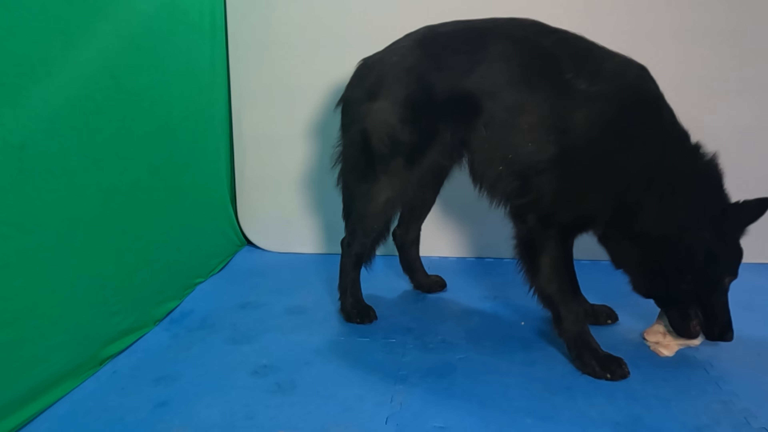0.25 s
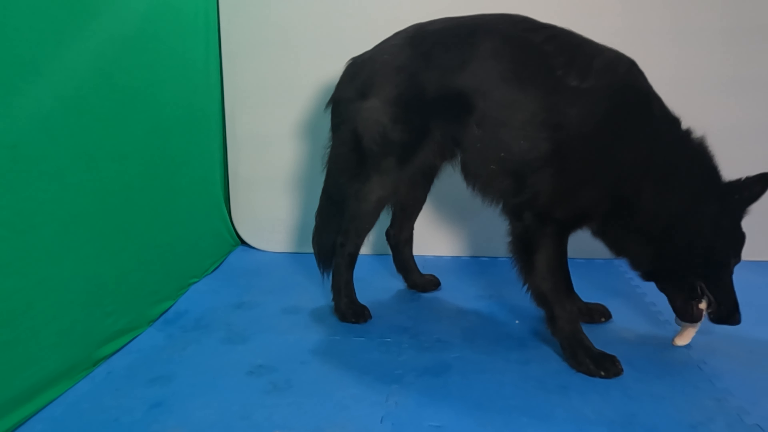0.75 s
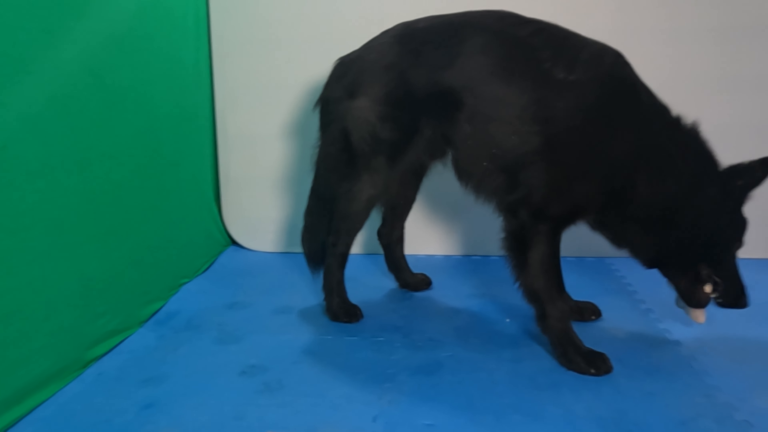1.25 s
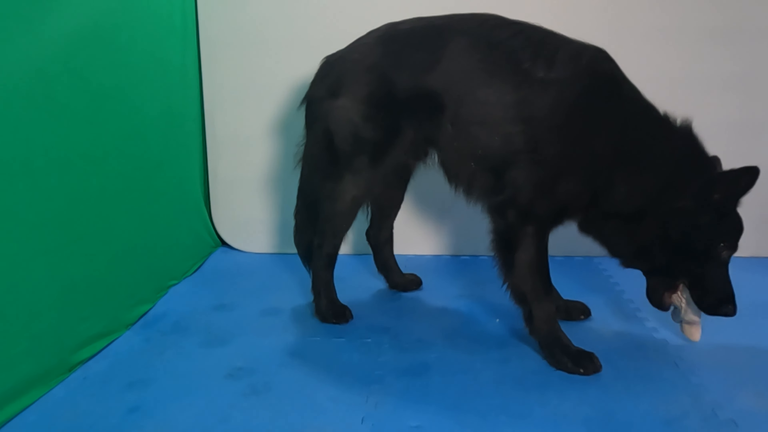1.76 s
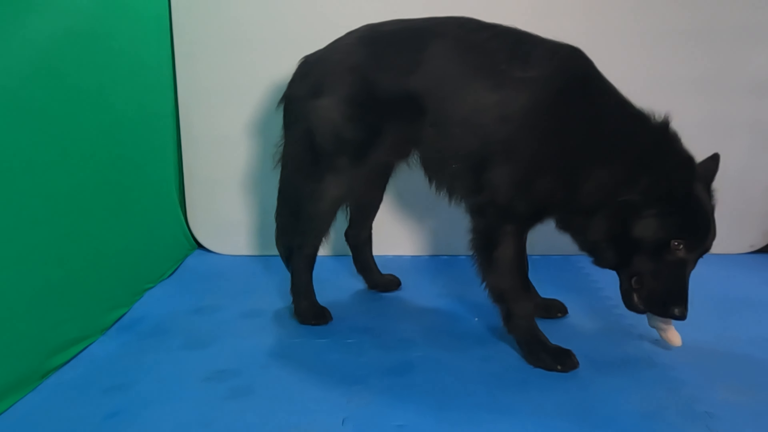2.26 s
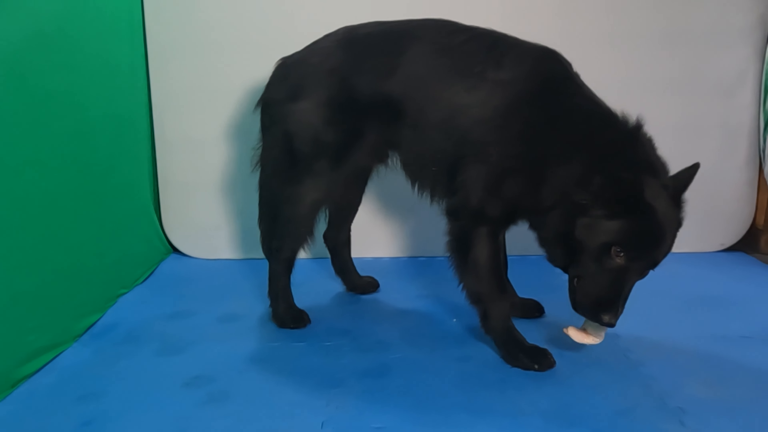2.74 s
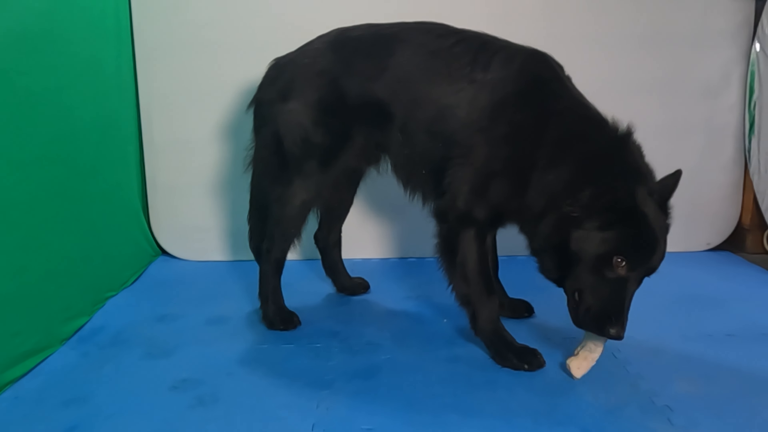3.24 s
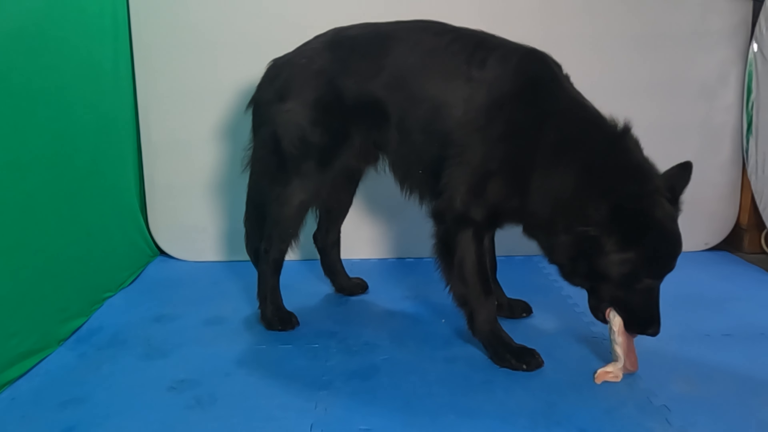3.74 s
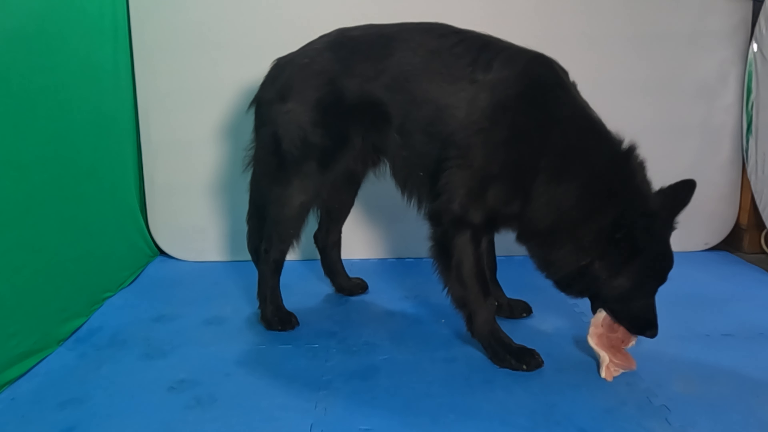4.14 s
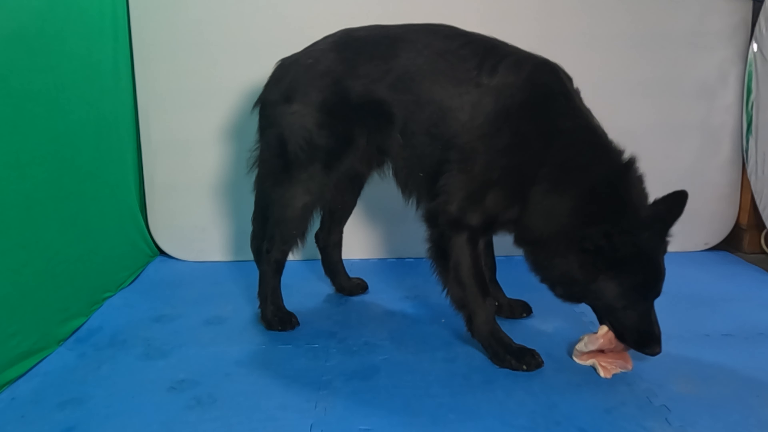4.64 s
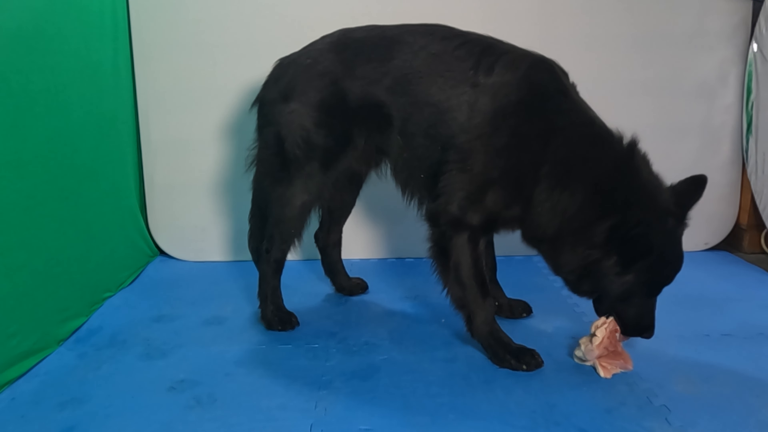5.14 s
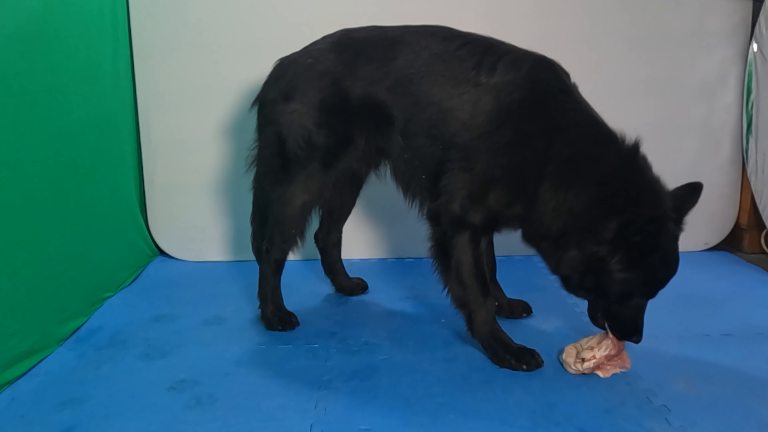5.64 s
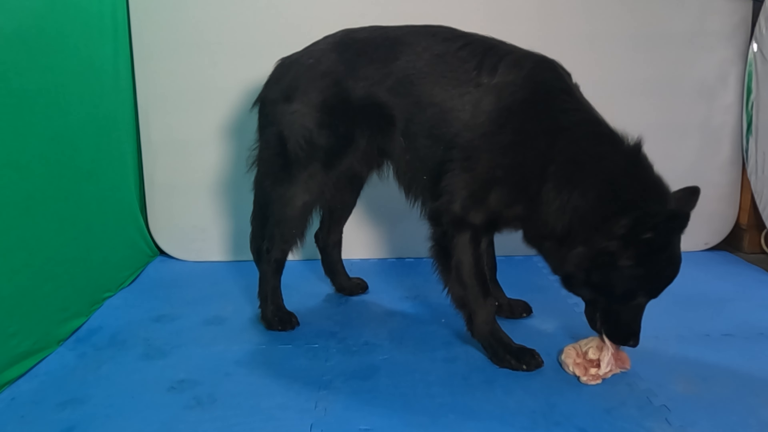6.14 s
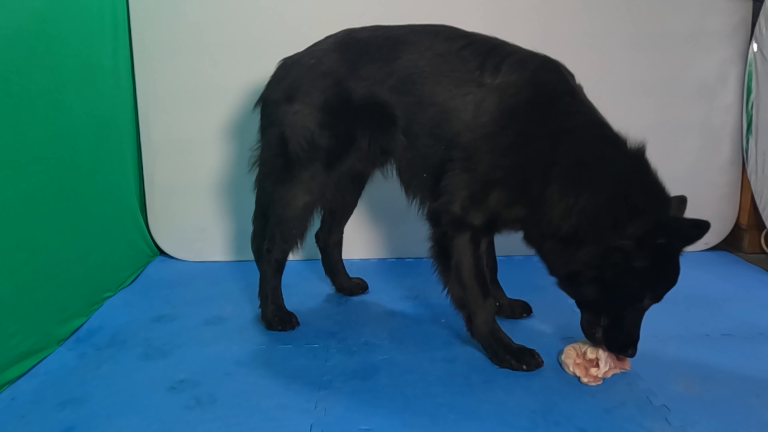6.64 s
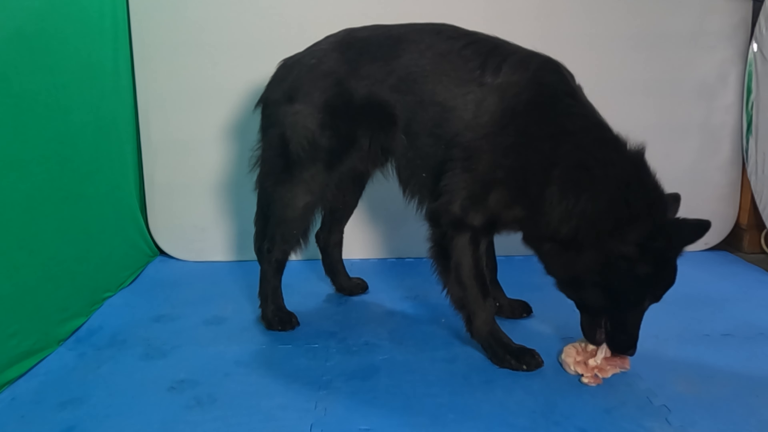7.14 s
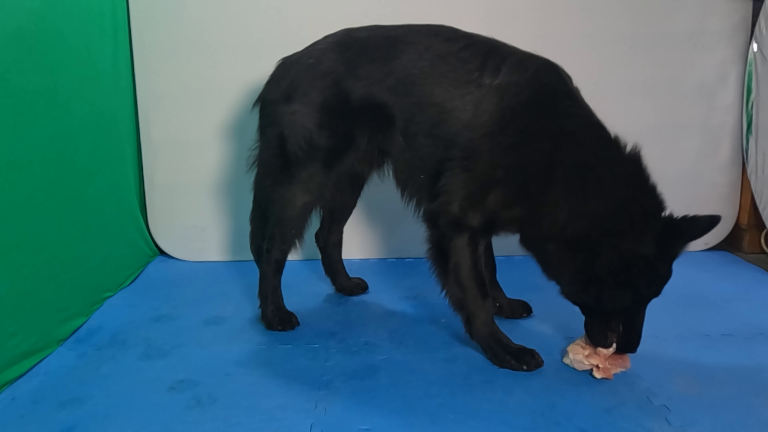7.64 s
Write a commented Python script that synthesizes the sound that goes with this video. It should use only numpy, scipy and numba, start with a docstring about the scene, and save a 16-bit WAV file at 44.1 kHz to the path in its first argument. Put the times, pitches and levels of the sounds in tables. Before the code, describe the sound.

A large dog chews a slab of raw meat up close, with wet squelches, sharp lip smacks and low microphone-stand thuds near the start.

```python
"""A dog chews and licks raw meat on a foam mat in a small room, a stereo microphone on a stand close by.
Low rumble, faint hiss and squelches run from the start: noise shaped by spectra, and random crackles
ringing in throat, mouth and lips. Smacks join at 0.2 s, each a damped ring and a bright snap of noise.
Bumps sway, knock and buzz the stand between 0.3 and 2.7 s, hardest from 1.5 to 2 s; from 1.3 s
air pockets ring on as narrow noise. Chewing thins out later; the room echoes all mouth sounds."""
import sys
import numpy as np
from scipy import signal
from scipy.fft import rfft, irfft
from scipy.io import wavfile
from numba import njit

SR = 44100
rng = np.random.default_rng(int(sys.argv[2]) if len(sys.argv) > 2 else 0)


def output_pcm(signal):
    """Save a mono or channel-first signal as 16-bit PCM at the path in sys.argv[1].

    Samples are clipped to [-1, 1] before scaling.
    """
    pcm = np.clip(np.atleast_2d(signal).T, -1, 1) * 32767
    wavfile.write(sys.argv[1], SR, np.round(pcm).astype(np.int16))


N = 347949   # length [samples]

# bumps on the microphone stand: (time [s], peak level [dB], sway frequency [Hz], sway t60 [s],
# push +1 or pull -1, knock re peak [dB], buzz level [dB])
BUMPS = [(0.268, -37.5, 97.5, 0.42, 1, -27, -64), (.68, -58, 30.2, .2, 1, -14, -50),
         (0.80, -30, 23.6, 1, 1, -31, -50.5), (0.879, -33.5, 90.2, 0.43, -1, -37, -56),
         (1.07, -66, 30.3, 0.18, 1, -33, -54), (1.18, -42, 30, 0.25, 1, -23, -46.5),
         (1.291, -32, 40, 0.23, 1, -19, -59), (1.325, -31.5, 40, 0.11, -1, -10, -29.5),
         (1.38, -41, 35, 0.18, 1, -17, -32.5), (1.46, -50, 35, .2, -1, -27, -47),
         (1.529, -10, 31.3, 0.31, 1, -28.5, -16), (1.635, -9, 25.4, 0.2, -1, -31.5, -40),
         (1.716, -8.5, 30.7, 0.38, -1, -24, -14), (1.776, -7, 40.3, 0.076, -1, -28.5, -42),
         (1.969, -31.5, 50, 0.057, -1, 5, -30), (1.974, -7.5, 35.8, 0.29, 1, -36, -26.5),
         (2.04, -25.5, 35.2, 0.47, 1, -30, -62), (2.65, -45, 35.4, 0.12, 1, -21.5, -50.5),
         (2.721, -41, 35, 0.17, 1, -10.5, -43.5)]


def from_db(db):
    """Decibels to gain."""
    return 10 ** (np.asarray(db) / 20)


def left_right(db):
    """Gains of the two channels for a left-minus-right level difference in dB."""
    return from_db([[db / 2], [-db / 2]])


def rms_one(x):
    """Scale to rms 1."""
    return x / np.sqrt(np.mean(x ** 2) + 1e-20)


def band_pass(x, low_hz, high_hz, order=2):
    """Keep what lies between two frequencies."""
    return signal.sosfilt(signal.butter(order, [low_hz, high_hz], "band", fs=SR, output="sos"), x)


def high_pass(x, hz):
    """Keep what lies above a frequency."""
    return signal.sosfilt(signal.butter(2, hz, "high", fs=SR, output="sos"), x)


def in_time(rows):
    """Each column of a table of (time [s], values...), interpolated sample by sample."""
    s, *columns = np.transpose(rows)
    return [np.interp(np.arange(N) / SR, s, c) for c in columns]


def at_hz(points, hz):
    """A table of (frequency [Hz], value) read on a log-frequency axis."""
    hz_points, values = np.transpose(points)
    return np.interp(np.log(np.maximum(hz, 1)), np.log(hz_points), values)


def colour(x, spectrum):
    """Shape by a spectrum with a causal (minimum-phase) filter; rms 1."""
    size = 8192
    spectrum_db = at_hz(spectrum, np.fft.rfftfreq(size, 1 / SR))
    cepstrum = irfft(np.log(from_db(spectrum_db)))
    # folding the cepstrum onto positive time gives the minimum phase
    cepstrum[1:size // 2] *= 2
    cepstrum[size // 2 + 1:] = 0
    response = irfft(np.exp(rfft(cepstrum)))
    response = response.reshape((1,) * (x.ndim - 1) + (-1,))
    return rms_one(signal.oaconvolve(x, response, axes=-1)[..., :N])


def resonate(x, modes):
    """Parallel resonances (Hz, width of one pass in Hz, dB), each applied twice; rms 1."""
    out = 0
    for hz, width_hz, level_db in modes:
        r = np.exp(-np.pi * width_hz / SR)
        poles = [1, -2 * r * np.cos(2 * np.pi * hz / SR), r * r]
        once = signal.lfilter([1, 0, -1], poles, x)
        out = out + from_db(level_db) * rms_one(signal.lfilter([1, 0, -1], poles, once))
    return rms_one(out)


def stereo_noise(alike):
    """Two channels of noise with the given correlation."""
    mid, side = rng.standard_normal((2, N))
    alike = np.clip(alike, 0, 1)
    return np.sqrt(1 + alike) * mid + np.sqrt(1 - alike) * side * np.array([[1], [-1]])


def damped(t, hz, t60):
    """A struck mode: a sine that falls 60 dB in t60 seconds."""
    return np.sin(2 * np.pi * hz * t) * from_db(-60 * t / t60)


def add(out, s, sound):
    """Mix a short sound in at time s."""
    i = round(s * SR)
    out[:, i:i + sound.shape[1]] += sound[:, :N - i]


def drift(per_s):
    """Slow random wander of rms 1."""
    r = np.exp(-2 * np.pi * per_s / SR)
    wander = signal.lfilter([1], [1, -2 * r, r * r], rng.standard_normal(N + SR))
    return rms_one(wander[SR:])   # the first second lets the filter settle


def background():
    """Lumpy rumble swelling in the room's lowest resonances, and steady hiss."""
    # rumble over time: (time [s], deep level [dB], upper level [dB])
    rumble_curve = [(0.0, -44, -49.5), (0.7, -48, -57.5), (1.21, -41, -52), (1.54, -47, -37),
                    (1.69, -29.5, -31.5), (1.89, -41, -32), (2.11, -38, -50), (2.37, -53.5, -60),
                    (2.72, -42.5, -56.5), (3.49, -51, -56), (3.91, -42, -55), (4.33, -58, -58),
                    (4.57, -45.5, -57.5), (5.3, -43.5, -57.5), (6.17, -50.5, -60), (6.39, -43, -56.5),
                    (6.85, -51.5, -57.5), (7.89, -48.5, -63)]
    # lowest room resonances: (frequency [Hz], width of one pass [Hz], relative level [dB])
    deep_modes = [(28, 9.8, -1.5), (41.4, 9.8, 1)]
    # spectrum of the upper rumble: (frequency [Hz], relative level per Hz [dB])
    upper_spectrum = [(36, -20), (62, -3), (94, 4.5), (118, -9.5), (166, -12), (205, -13), (248, -28.5),
                      (375, -30), (450, -33), (580, -50), (990, -120)]
    # spectrum of the hiss: (frequency [Hz], relative level per Hz [dB])
    hiss_spectrum = [(150, -31), (250, 1.5), (277, -9), (844, -17.5), (1000, -13), (3440, -25.5),
                     (5460, -24), (6370, -20.5), (12200, -34), (13300, -48), (15000, -53)]
    hiss_db = -73.5
    deep_db, upper_db = in_time(rumble_curve)
    lumps_db = 2.5 * drift(per_s=7.5)
    deep = from_db(deep_db + lumps_db) * resonate(stereo_noise(.97), deep_modes)
    upper = from_db(upper_db + lumps_db) * colour(stereo_noise(0.65), upper_spectrum)
    hiss = from_db(hiss_db) * colour(stereo_noise(0.17), hiss_spectrum)
    return deep + upper + hiss


def squeezing():
    """Jaw or tongue squeezes the meat: squelch and fizz gains, and resonances gliding between squeezes."""
    # squeezes: (time [s], hold [s], relative squelch level [dB], mouth re squelch [dB],
    # relative fizz level [dB], throat resonance [Hz], mouth resonance [Hz], lip resonance [Hz])
    squeeze_rows = [(-.03, 0.11, -44, 0.5, -50, 775, 1580, 3880),
                    (0.064, 0.083, -51, -1, -53, 990, 2026, 3900),
                    (0.175, 0.092, -53, 4, -57.5, 1010, 1560, 4400),
                    (0.295, 0.28, -66, 4, -69.5, 570, 1540, 5230),
                    (0.54, 0.34, -69, 3, -75.5, 650, 1680, 5140),
                    (0.78, .04, -49.5, -16, -47.5, 1190, 1990, 4400),
                    (0.821, 0.034, -50, -9, -52, 630, 1260, 3900),
                    (0.898, 0.028, -47, 5, -53, 720, 1860, 4830),
                    (1.1, 0.15, -68, 5, -74.5, 700, 1570, 4060),
                    (1.282, 0.11, -46, -33, -48.5, 604, 1400, 4350),
                    (1.395, 0.093, -68, 10, -60.5, 890, 2050, 3880),
                    (1.51, 0.013, -37.5, -1.5, -49, 574, 1770, 3230),
                    (1.618, 0.019, -57, -20, -60, 450, 1640, 5440),
                    (1.697, 0.15, -48, -12, -60.5, 480, 1490, 4840),
                    (1.867, 0.083, -48, -5.5, -47, 594, 1950, 3700),
                    (1.951, 0.018, -38.5, 7.5, -65, 460, 1450, 3270),
                    (2.002, 0.083, -43, 0, -52, 680, 1640, 4750),
                    (2.32, 0.32, -67.5, 5, -73, 990, 1915, 3740),
                    (2.459, 0.11, -57.5, -1.5, -63, 950, 1510, 4400),
                    (2.563, 0.14, -55.5, -0.5, -58, 915, 1620, 4700),
                    (2.691, 0.039, -46.5, 0, -62.5, 645, 1350, 4220),
                    (2.796, 0.012, -53, -1, -60.5, 1090, 2300, 2750),
                    (2.89, 0.17, -71, -1, -70, 1300, 1900, 4540),
                    (3.055, 0.22, -58.5, -0.5, -55.5, 916, 2050, 4270),
                    (3.209, 0.071, -50.5, -0.5, -63, 620, 1400, 3900),
                    (3.282, 0.082, -54, -0.5, -65, 1246, 1850, 4300),
                    (3.45, 0.011, -50, -16, -46.5, 1350, 1610, 4600),
                    (3.554, 0.11, -53, 2, -55, 1060, 1560, 3960),
                    (3.713, 0.11, -61, -1, -68.5, 926, 1620, 4960),
                    (3.829, 0.06, -67, -2, -62.5, 1160, 2560, 3980),
                    (3.943, 0.2, -75.5, -28, -87, 1120, 1400, 4900),
                    (4.128, 0.13, -66, 3, -61.5, 720, 1730, 4930),
                    (4.338, 0.041, -59.5, 6, -63.5, 660, 1450, 4550),
                    (4.623, 0.15, -73, -2, -70, 790, 1780, 5600),
                    (4.73, .02, -68, -19, -69, 980, 2100, 5000),
                    (4.755, 0.04, -60.5, -0.5, -66, 905, 1940, 3560),
                    (4.878, .05, -58, -3, -69.5, 660, 1730, 4300),
                    (4.95, 0.041, -83, -4, -66.5, 735, 1850, 4800),
                    (5.067, 0.11, -90, -10, -79, 600, 1700, 5300),
                    (5.175, 0.083, -70.5, -6, -68, 580, 2020, 4100),
                    (5.38, 0.27, -83, -5, -78, 630, 1850, 5830),
                    (5.54, 0.03, -74, -2, -64.5, 895, 1950, 4000),
                    (5.667, 0.044, -79, -11, -67, 1040, 2200, 4120),
                    (5.735, .05, -64, 6, -67, 920, 1980, 4930),
                    (5.927, 0.073, -53.5, -4, -63, 530, 1480, 4900),
                    (6.005, 0.19, -70, -14, -68, 764, 1740, 5100),
                    (6.257, 0.018, -57, -13, -63, 720, 1940, 4700),
                    (6.383, .02, -73, -5, -68, 696, 1900, 6000),
                    (6.405, 0.047, -55, 0, -60, 696, 1490, 4750),
                    (6.537, 0.086, -76, -8, -74.5, 620, 1680, 5750),
                    (6.698, 0.12, -74.5, -3.5, -77.5, 620, 1630, 5400),
                    (6.966, 0.079, -81, 0, -73.5, 562, 1850, 5400),
                    (7.099, 0.076, -70, -5, -61.5, 930, 2020, 4500),
                    (7.215, 0.074, -68.5, -2, -69, 610, 1620, 4480),
                    (7.321, 0.037, -68.5, 3, -63.5, 820, 1700, 4570),
                    (7.512, 0.026, -48.5, -18, -55, 527, 2100, 3580),
                    (7.557, 0.028, -57.5, -1, -59.5, 940, 2060, 3200),
                    (7.6, 0.049, -62, -1, -63, 850, 2140, 5030),
                    (7.724, 0.3, -66, -3, -78.5, 1120, 1780, 5250)]
    # a squeeze sets in from bite_db below its level, sags while held, then lets go
    bite_db, bite_db_per_s, sag_db_per_s, ease_db_per_s = 20, 1500, 7.5, 253
    s, hold, low_db, mouth_db, high_db, *hz = np.transpose(squeeze_rows)
    powers = np.zeros((2, N))
    for k in range(len(s)):
        t = np.arange(SR // 2) / SR + max(-s[k], 0)   # the first is already under way
        shape_db = np.minimum(bite_db_per_s * t - bite_db, -sag_db_per_s * t)
        shape_db = shape_db - ease_db_per_s * np.maximum(t - hold[k], 0)
        levels_db = np.array([[low_db[k]], [high_db[k]]])
        add(powers, max(s[k], 0), from_db(2 * (shape_db + levels_db)))   # overlaps add as power
    # resonances stay put during a squeeze and glide until the next
    ends = np.minimum(s + hold, np.append(s[1:], N / SR) - .01)
    starts_held = np.transpose([s, mouth_db, *hz])
    ends_held = np.transpose([ends, mouth_db, *hz])
    held = np.vstack([starts_held, ends_held])
    return (*np.sqrt(powers), *in_time(held[np.argsort(held[:, 0])]))


def crackles(per_s, spread_db, clump_db):
    """Saliva films break at random, swelling and thinning in clumps, a few louder than the rest."""
    sizes = from_db(spread_db * np.minimum(rng.exponential(1, N), 4)) * rng.choice([-1, 1], N)
    breaks = rng.random(N) < per_s / SR
    return sizes * from_db(clump_db * drift(23.5)) * breaks


@njit
def cavity(x, hz, q, rate):
    """A resonance whose centre moves sample by sample; gain about 1 at its peak."""
    out, y1, y2 = np.zeros(len(x)), 0., 0.
    for i in range(2, len(x)):
        r = np.exp(-np.pi * hz[i] / q / rate)
        driven = (1 - r * r) / 2 * (x[i] - x[i - 2])
        out[i] = driven + 2 * r * np.cos(2 * np.pi * hz[i] / rate) * y1 - r * r * y2
        y1, y2 = out[i], y1
    return out


def twice(x, hz, q):
    """A steep moving resonance: the cavity applied twice; rms 1."""
    return rms_one(cavity(cavity(x, hz, q, SR), hz, q, SR))


def bubbles(per_s, cycles):
    """Small saliva bubbles burst, each ringing at one of 16 pitches, 60 dB down after the given cycles."""
    clicks = crackles(per_s, spread_db=2.5, clump_db=6.5)
    dealt, out = rng.integers(0, 16, N), 0   # which pitch each click gets
    for k, hz in enumerate(np.geomspace(2300, 7500, 16)):
        r, w = from_db(-60 * hz / cycles / SR), 2 * np.pi * hz / SR
        own_clicks = clicks * (dealt == k) + 1e-18
        out = out + signal.lfilter([0, np.sin(w)], [1, -2 * r * np.cos(w), r * r], own_clicks)
    return rms_one(high_pass(out, 1800))


def squelch():
    """Crackles through the wet flesh: dull pops ringing in throat and mouth, bright fizz at the lips."""
    # spectrum of the dull pops: (frequency [Hz], relative level per Hz [dB])
    pop_spectrum = [(160, -30.5), (280, 1), (449, -1.5), (816, -2.5), (934, -4), (1210, 3), (2800, -5.5),
                    (3640, -20.5), (6160, -120)]
    # spectrum of the fizz: (frequency [Hz], relative level per Hz [dB])
    fizz_spectrum = [(1410, -29), (2400, 3), (4070, -9), (5090, -1.5), (6630, 2.5), (8240, -14.5),
                     (10100, -12), (12600, -22), (14400, -36), (15300, -72)]
    low, high, mouth_db, throat_hz, mouth_hz, lip_hz = squeezing()
    mouth_share = np.clip(from_db(mouth_db), 0, .99)
    throat_share = np.sqrt(1 - mouth_share ** 2)   # what the mouth takes, the throat lacks
    pops = crackles(700, spread_db=2.5, clump_db=-0.5)
    throat = throat_share * twice(pops, throat_hz, q=4.3)
    mouth = mouth_share * twice(pops, mouth_hz, q=4.4)
    pops = 0.39 * colour(pops, pop_spectrum) + 0.48 * (throat + mouth)
    fizz = colour(crackles(2200, spread_db=3.0, clump_db=3.5), fizz_spectrum)
    fizz = .55 * fizz + .6 * twice(fizz, lip_hz, q=1.8) + .45 * bubbles(450, cycles=28.0)
    return low * pops * left_right(-1.8) + high * fizz * left_right(-.8)


def smacks():
    """Tongue and teeth: each smack is a rough ring at the mouth's pitch and a short bright snap."""
    # smacks: (time [s], relative level [dB], mouth ring [Hz], ring t60 [s],
    # treble snap re that level [dB], left minus right [dB])
    smack_rows = [(0.218, -42, 1070, 0.021, -6, -1.0), (0.248, -51.5, 1060, 0.013, 10, 3),
                  (0.283, -38, 4860, 0.029, -9, 2), (0.534, -49, 2840, 0.044, -5, -4),
                  (0.715, -61, 795, 0.013, 13.5, 1), (0.798, -42, 1170, 0.042, 5, -8),
                  (0.817, -31, 1060, 0.013, -12, 5), (0.873, -41, 2640, 0.071, -9, -6),
                  (0.912, -26.5, 2450, 0.017, -5.5, -4), (0.912, -36, 730, .02, -20, -1),
                  (0.924, -20.5, 4340, 0.015, -28, -1.5), (1.107, -52.5, 1660, 0.027, -42, -1),
                  (1.29, -50, 660, 0.018, -14, -11), (1.301, -42, 1254, 0.27, 6, -3),
                  (1.408, -27.5, 2690, 0.016, -0.5, -3), (1.505, -34, 3420, 0.017, 6, 0),
                  (1.528, -21, 2830, 0.016, -9, -6), (1.634, -31.5, 1600, 0.017, 1.5, 2),
                  (1.692, -52, 651, 0.015, -32, -31), (1.715, -24.5, 868, 0.026, -13.5, 4),
                  (1.772, -45, 991, 0.056, -26, 8), (1.846, -49.5, 713, 0.025, 13, -1.5),
                  (1.871, -43, 646, 0.036, -18, -1.0), (1.898, -44, 670, 0.02, 8, -7),
                  (1.927, -29, 940, 0.016, -4, -3), (1.967, -57, 845, 0.014, -31, -5.5),
                  (2.004, -46, 970, 0.043, -22, -8), (2.313, -55.5, 2230, 0.076, -22, -2),
                  (2.403, -53, 1620, 0.039, -4, 6), (2.468, -42.5, 2050, 0.026, -19, -8),
                  (2.475, -40, 1470, 0.027, -20, 3), (2.513, -47.5, 1540, 0.022, 11.5, 1),
                  (2.53, -45, 910, 0.043, 3, -6), (2.537, -38.5, 980, 0.049, 0, 2),
                  (2.593, -29.5, 1560, 0.012, 0, 0), (2.665, -34, 2220, 0.017, -0.5, -2),
                  (2.722, -38, 1010, 0.024, -24, 0), (2.813, -34, 2660, 0.017, -54, -4),
                  (2.863, -41, 2320, 0.026, -19, -3), (2.898, -39.5, 5220, 0.016, -35, -2.0),
                  (2.924, -41.5, 2410, 0.028, -30, -5), (3.016, -53.5, 2110, 0.084, 2, 0.0),
                  (3.061, -46, 5570, 0.025, -15, 0), (3.072, -45, 2360, 0.15, -17, -5),
                  (3.102, -32.5, 3840, 0.024, -15, -3), (3.153, -44, 4660, 0.055, 9.5, 2),
                  (3.225, -44.5, 2090, 0.051, -7, -7), (3.273, -38.5, 2550, 0.03, -15, -5),
                  (3.298, -38.5, 3250, 0.039, -21, -1), (3.428, -45.5, 2470, 0.025, 4, 2),
                  (3.461, -28, 5300, 0.011, -21, 0), (3.47, -38.5, 1470, 0.046, -11, 5),
                  (3.472, -26, 2540, 0.01, -18, -3), (3.566, -47.5, 1610, 0.086, -2, 9),
                  (3.587, -32.5, 900, 0.025, -12, -3), (3.641, -33.5, 4000, 0.018, -17, -1.0),
                  (3.679, -53, 1300, 0.035, -7, 17), (3.723, -35.5, 4900, 0.02, -27, -1.5),
                  (3.819, -46.5, 2700, 0.042, -17, 4), (3.857, -34.5, 4500, 0.018, -27, 1),
                  (3.986, -54, 1080, 0.041, -22, 2), (4.125, -55, 6600, 0.076, -20, 3),
                  (4.147, -49.5, 4270, 0.026, 11.5, -1.0), (4.2, -40.5, 3600, 0.03, 6.5, -1.5),
                  (4.359, -50.5, 1570, 0.011, 8, -3), (4.773, -43, 2000, 0.034, 2.5, -4),
                  (4.858, -58.5, 689, 0.027, 9, -1.0), (4.899, -45, 1745, 0.031, -22, -10),
                  (5.352, -46, 6700, 0.027, -0.5, -1), (5.627, -55, 1010, 0.033, -4, -1.5),
                  (5.648, -52, 3200, 0.041, -8, -3.5), (5.659, -56.5, 2840, 0.047, -1, 1),
                  (5.675, -33, 3750, 0.017, -3, -2.0), (5.699, -55, 3800, 0.023, 13, 5),
                  (5.734, -45, 1000, 0.049, 2.5, -1.5), (5.755, -42, 980, 0.046, 1, 0),
                  (5.844, -52.5, 5660, 0.024, -25, -0.5), (5.94, -47.5, 4700, 0.04, -15, -4),
                  (5.95, -41.5, 4970, 0.039, -18, 2), (5.968, -33, 720, 0.025, -9, -2),
                  (6.045, -42.5, 974, 0.042, 0.5, -2.0), (6.169, -47, 4860, 0.026, 2, -1),
                  (6.247, -51, 966, 0.038, -0.5, -2.0), (6.414, -37, 5630, 0.031, -18, 2),
                  (6.425, -30.5, 4540, 0.02, -8.5, -4), (6.592, -50.5, 5900, 0.12, -16, 1),
                  (6.713, -51, 5700, 0.028, -1, 0), (6.759, -52.5, 5400, 0.022, -14, -1.5),
                  (6.97, -49, 5580, 0.035, -13, 2), (6.981, -43.5, 4200, 0.016, -5.5, -4),
                  (7.072, -46, 7540, 0.021, -22, 1), (7.096, -45, 970, 0.038, -2.5, -3),
                  (7.129, -57, 651, 0.01, 10, -7), (7.147, -41.5, 4700, 0.017, -1, -2.0),
                  (7.169, -48.5, 2000, 0.03, -3, -10), (7.232, -48.5, 5700, 0.035, -7, 1),
                  (7.258, -54.5, 3040, 0.016, 11.5, 0), (7.333, -43.5, 4890, 0.044, 5.5, 2),
                  (7.524, -49, 980, 0.03, -45, -8), (7.534, -41.5, 4150, 0.042, -23, -3.0),
                  (7.535, -40.5, 519, 0.078, -27, -1.5), (7.573, -25, 1086, 0.013, -35, -2),
                  (7.614, -44.5, 931, 0.017, 13, -1.5), (7.774, -61, 1240, 0.011, 17, 0),
                  (7.81, -48, 1065, 0.053, 0, 3), (7.834, -45.5, 1920, 0.02, -6, -3)]
    out, t = np.zeros((2, N)), np.arange(round(.08 * SR)) / SR
    opening = 1 - np.exp(-t / 0.00005)   # a wet seal tears in under a millisecond
    snap_shape = from_db(-60 * t / .015) * (1 - np.exp(-t / .0006))
    for s, level_db, hz, t60, snap_db, pan_db in smack_rows:
        ring_puff, snap_puff = rng.standard_normal((2, len(t)))
        rough = rms_one(band_pass(ring_puff, hz / 1.26, hz * 1.286)) * from_db(-60 * t / t60)
        clean = min(1, 1800 / hz) ** 2   # small high pockets ring less cleanly
        ring = 0.59 * clean * damped(t, hz, t60) + 0.35 * rough
        bright = band_pass(snap_puff, 2300, 7800, order=3)
        snap = rms_one(bright + 0.14 * high_pass(snap_puff, 9000))
        snap = from_db(snap_db) / 2 * snap * snap_shape   # halved: noise peaks near twice its rms
        add(out, s, from_db(level_db) * opening * (ring + snap) * left_right(pan_db))
    return out


def sway_and_knock():
    """Each bump sets the stand swaying slowly, strikes its modes and rattles its loose joints."""
    # stand modes: (frequency [Hz], level re knock [dB], t60 [s], left minus right [dB])
    knock_modes = [(81.5, 2.5, 0.37, -11), (103.7, 9, 0.13, -9.5), (195, 12, 0.058, 8),
                   (296, 0.5, 0.031, -26), (411, -15.5, 0.21, -28.5), (486, -23, 0.21, -6.5),
                   (837, -7, 0.041, 5), (1400, -11, 0.032, -11)]
    out, t = np.zeros((2, N)), np.arange(round(.4 * SR)) / SR
    # a -9 dB bump builds with this time constant [s]; fainter ones build slower
    push_s, push_db, gentler = 0.0021, -9, 0.38
    rattle_db, rattle_t60 = -1.5, .12   # re knock [dB], [s]
    for s, peak_db, hz, t60, way, knock_db, _ in BUMPS:
        blow = from_db(peak_db) * np.sign(way)
        build_s = push_s * from_db(gentler * (push_db - peak_db))
        add(out, s, blow * damped(t, hz, t60) * (1 - np.exp(-t / build_s)) * left_right(-6))
        joints = rms_one(band_pass(rng.standard_normal(len(t)), 180, 700))
        rattle = joints * from_db(knock_db + rattle_db - 60 * t / rattle_t60)
        add(out, s, blow * rattle * np.minimum(t / push_s, 1) * left_right(-12))
        for mode_hz, mode_db, mode_t60, pan_db in knock_modes:
            chance_db = 3 * rng.standard_normal()   # no two blows strike a mode alike
            strength = blow * from_db(knock_db + mode_db + chance_db)
            add(out, s, strength * damped(t, mode_hz, mode_t60) * left_right(pan_db))
    return out


def stand_buzz():
    """After each bump the stand buzzes: a tone and narrow noise that swell and die."""
    # buzz modes, the main one first: (frequency [Hz], width of one pass [Hz], relative level [dB])
    buzz_modes = [(155.04, 27, -5), (194.8, 27, -2)]
    rise_s, fall_t60 = 0.027, 0.24
    shaking, t = np.zeros((1, N)), np.arange(round(.4 * SR)) / SR
    swell = np.minimum(t / rise_s, 1) ** 2
    for s, *_, buzz_db in BUMPS:
        add(shaking, s, from_db([buzz_db - 60 * t / fall_t60]) * swell)
    # the main mode rings cleanly
    tone = np.sqrt(2) * np.sin(2 * np.pi * buzz_modes[0][0] * np.arange(N) / SR)
    buzz = 1.35 * tone + 0.93 * resonate(stereo_noise(0.45), buzz_modes)
    return shaking * buzz * left_right(-3)


def pockets():
    """Air seeping from pockets in the wet mouth keeps one narrow resonance sounding for a moment."""
    # pockets: (time [s], level [dB], frequency [Hz], t60 [s])
    pocket_rows = [(1.345, -37, 843, 0.12), (1.412, -53, 1390, 0.52), (2.528, -53, 1000, .15),
                   (3.476, -53, 1455, 0.42), (4.775, -56.5, 2060, 0.36), (4.86, -66.5, 640, .3),
                   (4.9, -53, 660, 0.19), (4.901, -59, 1740, 0.18), (4.997, -66, 3320, 0.15),
                   (5.622, -66.5, 1026, 0.28), (5.732, -53, 985, 0.097), (5.76, -53.5, 2060, 0.21),
                   (5.773, -53, 964, 0.11), (6.051, -54, 1010, 0.073), (6.272, -56.5, 1920, 0.25),
                   (6.28, -63, 770, 0.13), (6.455, -51.5, 698, 0.17), (7.098, -82, 880, 0.055),
                   (7.81, -55.5, 1950, 0.094), (1.325, -36.5, 397, 0.19), (2.569, -55.5, 1485, 1),
                   (2.827, -65.5, 1400, 1), (3.18, -67, 1350, 0.93), (3.587, -48, 4200, 0.26),
                   (4.2, -55.5, 3580, 0.18), (4.93, -58, 4840, 0.053), (5.966, -50, 420, 0.31),
                   (7.54, -48.5, 480, 0.18), (7.549, -53, 208, 0.13), (7.54, -46, 2150, 0.13)]
    out, t = np.zeros((2, N)), np.arange(round(.35 * SR)) / SR
    for s, level_db, hz, t60 in pocket_rows:
        seep = rms_one(band_pass(rng.standard_normal(len(t)), hz / 1.038 - 25, hz * 1.044 + 25))
        envelope = from_db(level_db - 60 * t / t60) * (1 - np.exp(-t / 0.0012))
        add(out, s, envelope * seep * left_right(-1.6))
    return out


def room(x):
    """Echoes as noise that dies band by band, partly its own in each channel."""
    # decay of the small room: (frequency [Hz], t60 [s])
    room_t60 = [(300, 0.44), (1500, 0.29), (5000, 0.27), (12000, 0.24)]
    t = np.arange(SR // 2) / SR
    noise, echoes = stereo_noise(0.38)[:, :len(t)], 0
    for hz in 250 * 2. ** np.arange(6):   # octave bands, the top one wider
        high_hz = hz * np.sqrt(2) * (1 if hz < 5000 else 1.5)
        band = band_pass(noise, hz / np.sqrt(2), high_hz)
        echoes = echoes + band * from_db(-60 * t / at_hz(room_t60, hz))
    # nothing returns in the first 4 ms
    echoes = echoes * (t > .004) / np.sqrt(np.sum(echoes ** 2) / 2)
    return signal.oaconvolve(x.mean(axis=0)[None], echoes, axes=1)[:, :N]


def scene():
    """Mouth sounds and their echoes, plus stand and background."""
    wet, clicks, seeping = squelch(), smacks(), pockets()
    # how much of each reaches the walls [dB]
    to_walls = from_db(-1) * wet + from_db(-2) * clicks + from_db(-8) * seeping
    stand = sway_and_knock() + stand_buzz()
    return background() + wet + clicks + stand + seeping + room(to_walls)


def record(dry):
    """Gain control ducks after loud peaks; the capsules differ a little; the top is cut."""
    threshold_db, release_db_per_s, duck_db_per_db, smooth_s = -24, 45, .4, 0.012
    cutoff_hz = 15500
    peak_db = 20 * np.log10(np.abs(dry).max(axis=0) + 1e-9)
    over_db = np.maximum(peak_db - threshold_db, 0)
    release = release_db_per_s * np.arange(N) / SR
    # jumps up with each peak, then sinks at the release rate
    held_db = np.maximum.accumulate(over_db + release) - release
    r = np.exp(-1 / (smooth_s * SR))
    ducked = dry * from_db(-duck_db_per_db * signal.lfilter([1 - r], [1, -r], held_db))
    # the left capsule hears everything one sample late
    ducked[0] = np.roll(ducked[0], 1)
    # treble is added on the left and subtracted on the right
    tilted = ducked + high_pass(ducked, 10000) * np.array([[.1], [-.6]])
    return signal.sosfilt(signal.cheby2(12, 70, cutoff_hz, fs=SR, output="sos"), tilted)


dry = scene()
out = record(dry)
output_pcm(out)
```